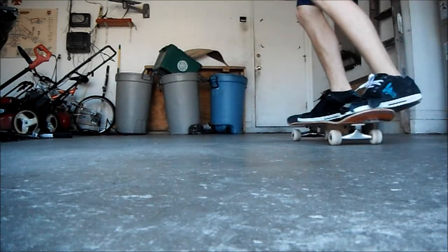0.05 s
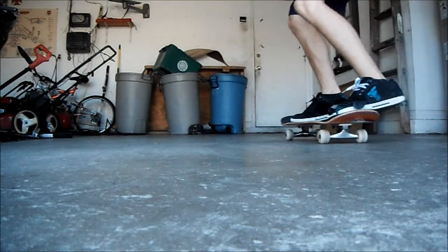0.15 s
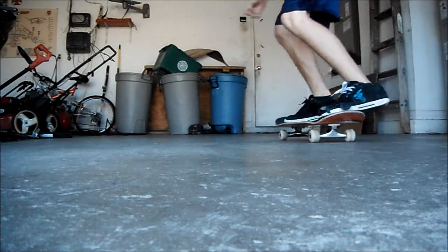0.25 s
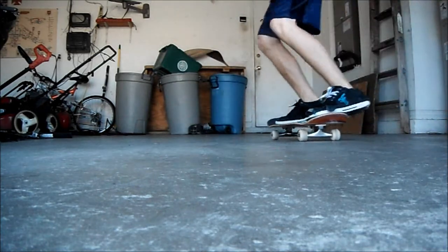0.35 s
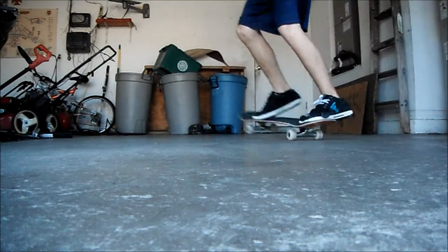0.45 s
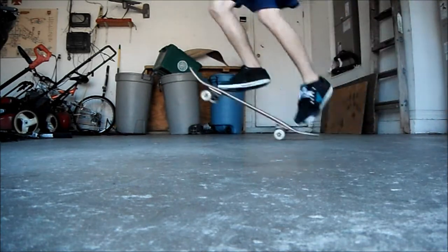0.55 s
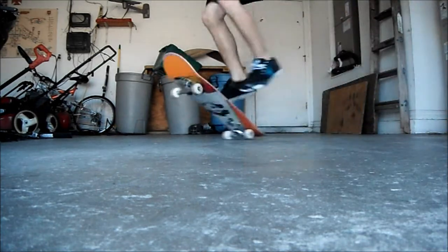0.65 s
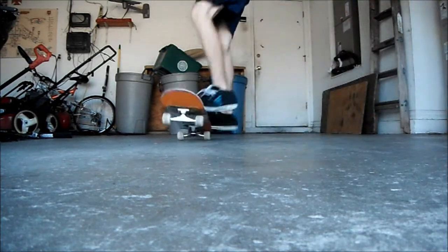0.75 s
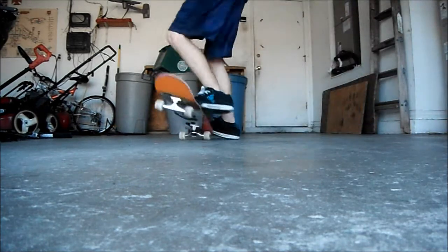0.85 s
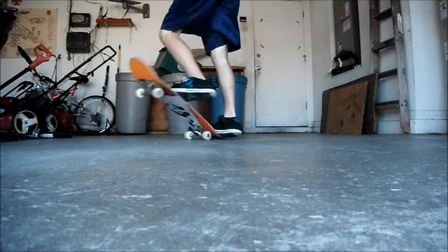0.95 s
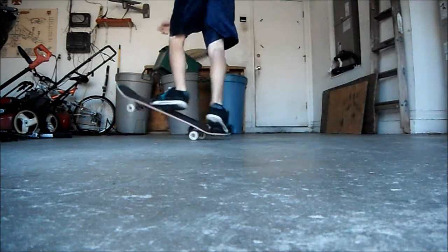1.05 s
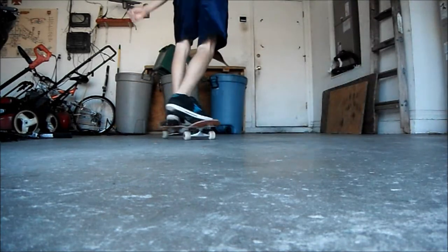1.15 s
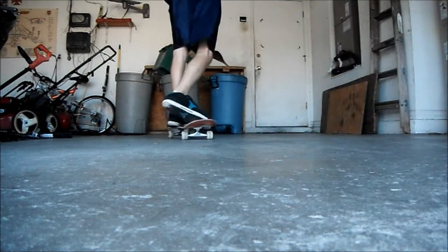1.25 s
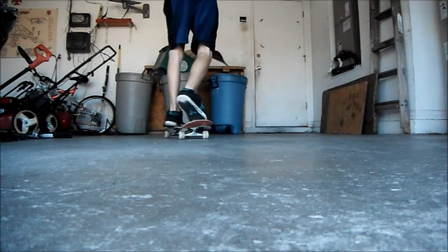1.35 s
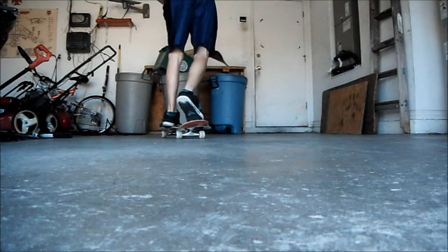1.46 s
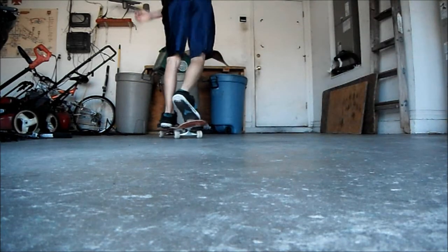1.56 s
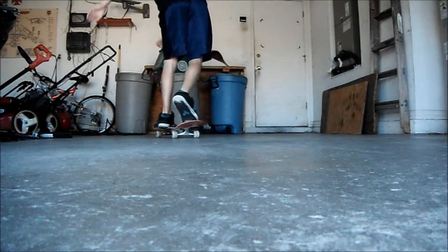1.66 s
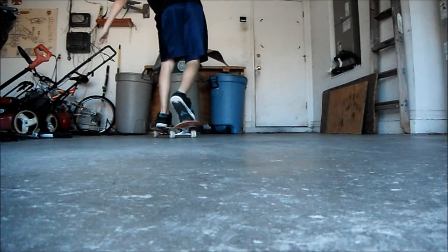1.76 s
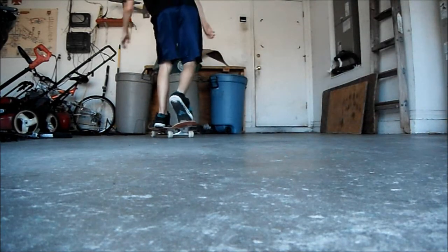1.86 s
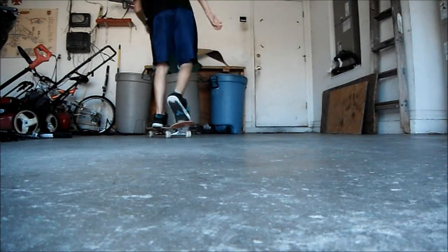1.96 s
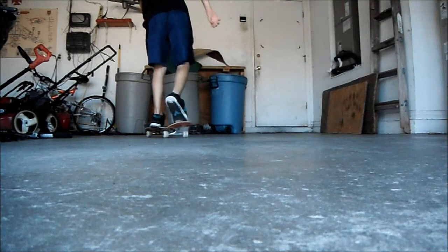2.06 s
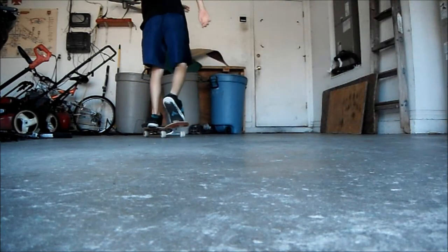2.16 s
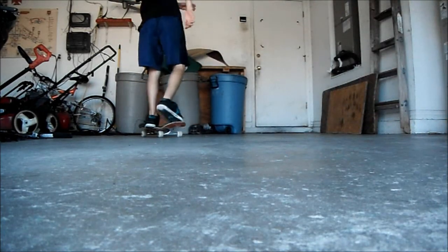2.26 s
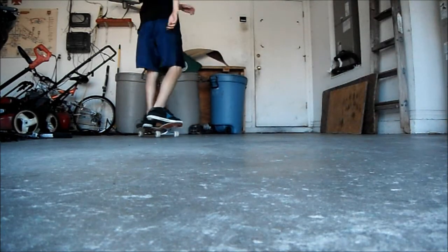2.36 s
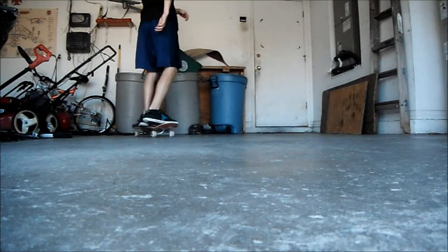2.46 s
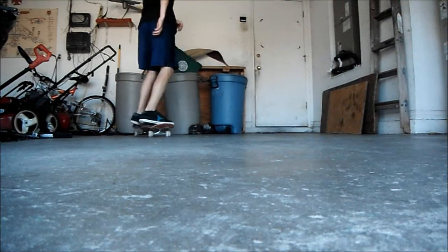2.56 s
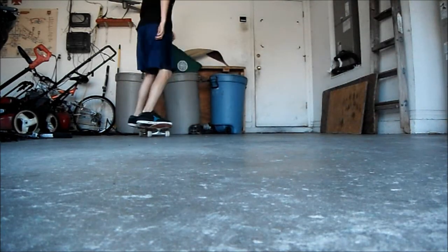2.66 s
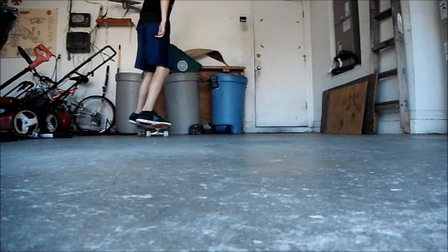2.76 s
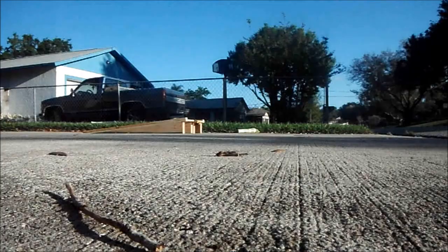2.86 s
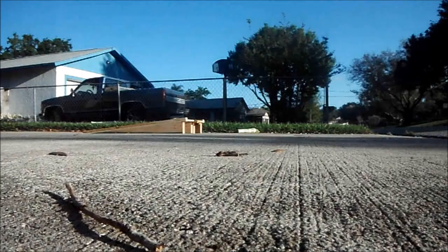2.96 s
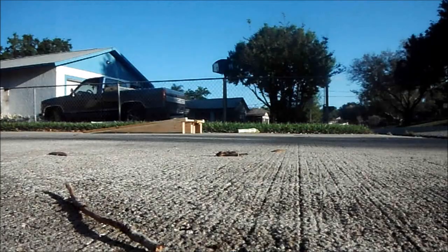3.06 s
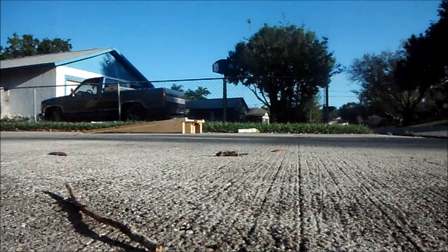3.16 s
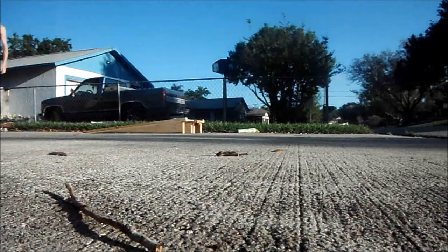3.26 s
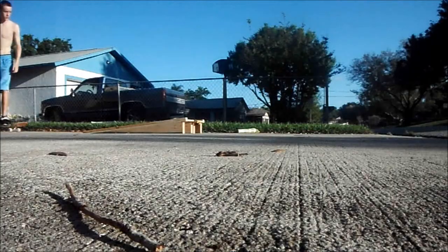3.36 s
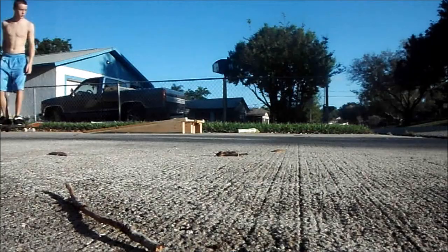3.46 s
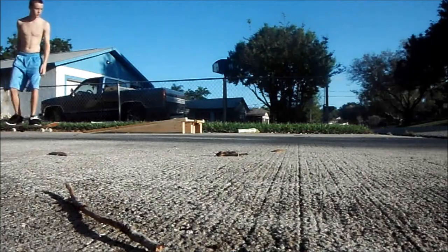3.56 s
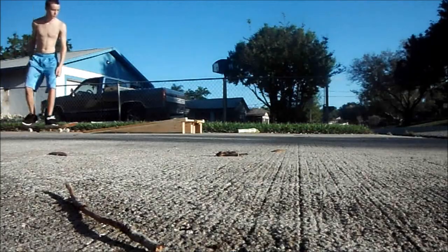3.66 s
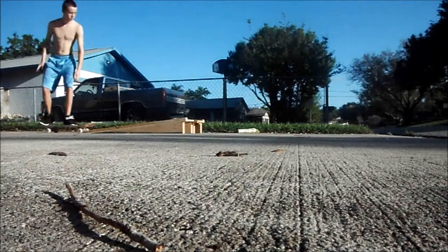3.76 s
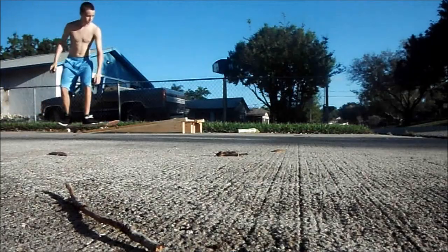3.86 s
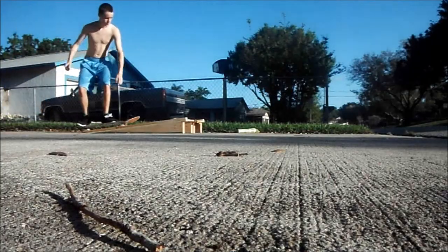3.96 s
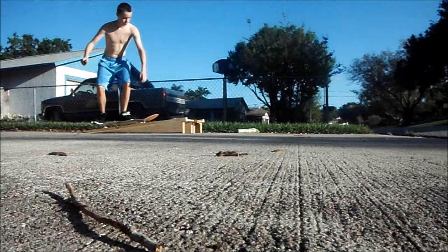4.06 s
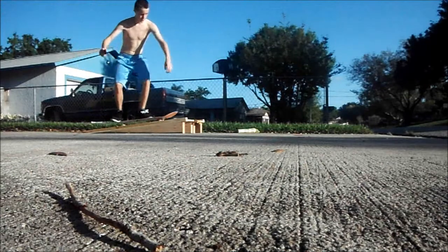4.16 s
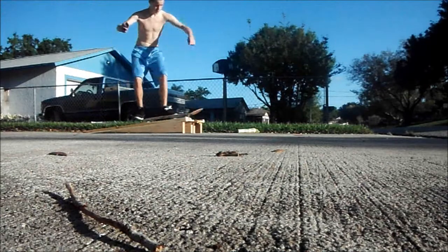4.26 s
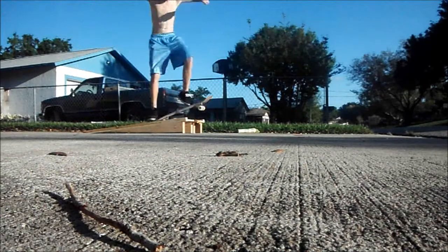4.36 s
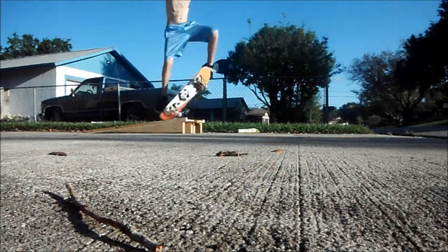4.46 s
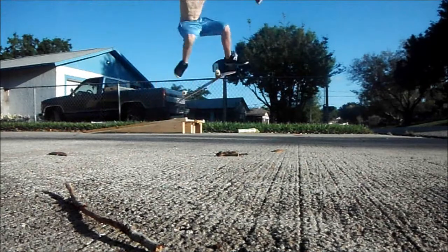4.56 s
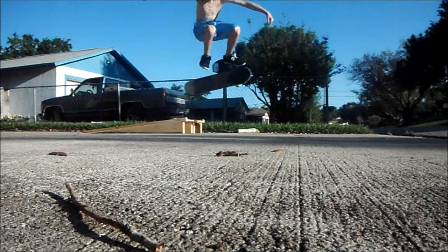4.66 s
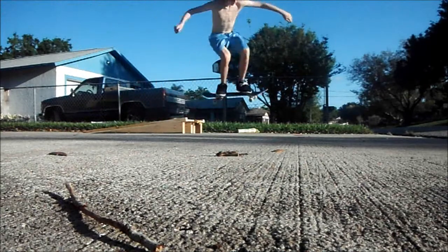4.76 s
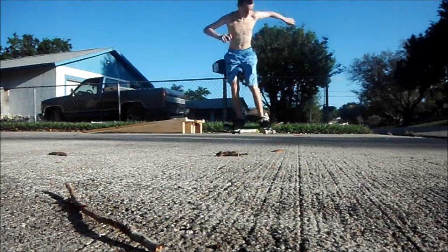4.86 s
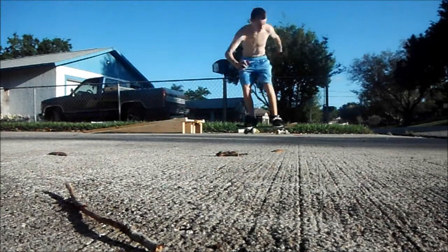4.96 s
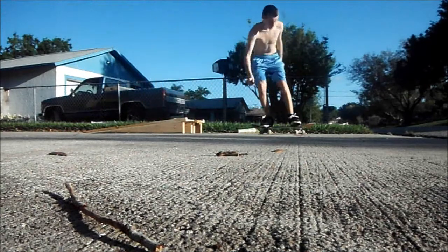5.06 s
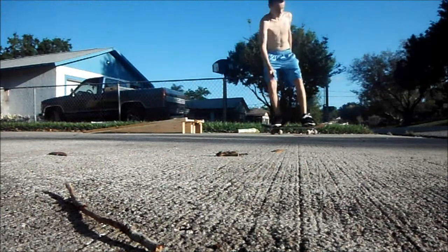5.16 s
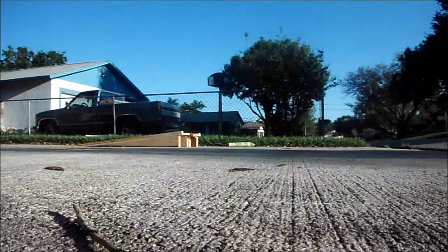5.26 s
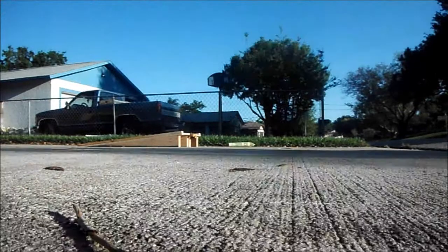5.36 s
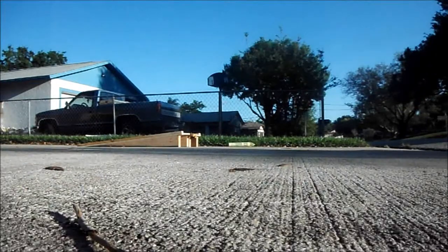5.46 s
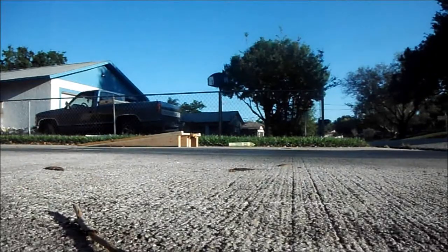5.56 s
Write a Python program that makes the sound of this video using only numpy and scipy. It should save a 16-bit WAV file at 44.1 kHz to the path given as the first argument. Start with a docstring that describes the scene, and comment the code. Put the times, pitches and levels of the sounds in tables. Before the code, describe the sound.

Two skateboard tricks, no talking. First, indoors with short room echo: soft rolling, scraping pivots, rapid wooden cracks, a metallic ping, a landing slap, then faint rasping soles and another knock. Abruptly outside, dry and open: rough rumbling wheels with rattle and grit, a heavy thump and boom on a wooden ramp, a sharp take-off crack, a landing and rolling away. Loud blows clip and duck the gain.

```python
"""Two skateboard runs. In a garage a board pivots, pops, slaps down and rolls on smooth concrete.
Then, outdoors, a board rumbles over rough pavement, bangs onto a wooden ramp, pops off it and lands.
Rolling, skidding and scuffing are streams of tiny random impacts, filtered and faded in and out.
Each blow is a knock with a burst of chatter that cracks, slaps the wheels and bends the deck.
The loudest blows overload the microphone and duck its gain."""
import sys
import numpy as np
from scipy import signal
from scipy.fft import rfft, irfft, next_fast_len
from scipy.io import wavfile

SR = 44100
rng = np.random.default_rng(int(sys.argv[2]) if len(sys.argv) > 2 else 0)


def log_audio(samples):
    """Write samples as a 16-bit WAV file to the path given in sys.argv[1]."""
    # one column per channel
    frames = np.atleast_2d(samples).T
    # limit to full scale, then quantise
    limited = np.clip(frames, -1, 1)
    pcm = np.round(limited * 32767).astype(np.int16)
    wavfile.write(sys.argv[1], SR, pcm)


N = 246959
TIME = np.arange(N) / SR
BINS = np.fft.rfftfreq(8192, 1 / SR)  # the frequencies (Hz) at which filters are drawn
OUTDOORS_AT_S = 2.806  # the garage ends and the street begins

# stretches of rolling outdoors: start t/s, length/s, rumble level/dB, grit level/dB, wheel hum f/Hz
STREET_ROLLS = [(2.782, 1.19, -30.5, -36, 136.8), (3.902, 0.22, -31.5, -64, 187),
                (4.257, 0.085, -26, -69.5, 193), (4.936, 0.28, -39, -41.5, 128.3),
                (5.234, 0.45, -29.5, -35.5, 98)]
GRIT_SAG_DB_PER_S = 6.5  # the grit fades as the board coasts


def amp(db):
    """Decibels to gain."""
    return 10 ** (np.asarray(db) / 20)


def evened(x):
    """Scales to rms 1."""
    return x / np.sqrt(np.mean(x ** 2) + 1e-20)


def read(points, hz):
    """Reads a table of (f/Hz, value) on a log-frequency axis."""
    f, value = np.transpose(points)
    return np.interp(np.log(hz + 1), np.log(f + 1), value)


def level(rows):
    """Turns rows of (t/s, level/dB) into a gain over time."""
    return amp(np.interp(TIME, *np.transpose(rows)))


def add(mix, s, sound):
    """Mixes a sound in at time s."""
    part = mix[round(s * SR):][:len(sound)]
    part += sound[:len(part)]


def peaks(modes):
    """Gain of resonances (f/Hz, width/Hz, level/dB), falling away below and above them."""
    power = 0
    for f, width, db in modes:
        power = power + amp(db) ** 2 * (BINS * width) ** 2 / ((BINS ** 2 - f ** 2) ** 2 + (BINS * width) ** 2)
    return np.sqrt(power)


def colour(x, gain):
    """Filters x by the shape of gain on BINS, scaled to unit energy; nothing sounds ahead of its cause."""
    log_gain = np.log(np.maximum(np.r_[gain, gain[-2:0:-1]], 1e-4))
    minimum_phase = np.exp(np.conj(signal.hilbert(log_gain)))
    taps = np.fft.ifft(minimum_phase).real[:len(BINS)]
    return signal.oaconvolve(x, taps / np.linalg.norm(taps))[:N]


def drift(per_s):
    """Smooth random wander of rms 1; a higher per_s wanders faster."""
    smoothing = 1 + (np.fft.rfftfreq(N, 1 / SR) / per_s) ** 4
    return evened(irfft(rfft(rng.standard_normal(N)) / smoothing, N))


def grains(per_s, spread_db, lumpy_db):
    """Tiny impacts of uneven size and random sign, swelling and thinning in strength; rms 1."""
    size = amp(spread_db * np.minimum(rng.exponential(1, N), 4)) * rng.choice([-1, 1], N)
    happens = rng.random(N) < per_s / SR
    return evened(size * happens * amp(lumpy_db * drift(25)))


def resonate(x, hz, width):
    """A resonance of gain 1 whose pitch may follow a curve: shift to zero, low-pass, shift back."""
    turn = np.exp(2j * np.pi * np.cumsum(hz * np.ones(N)) / SR)
    low_pass = signal.butter(2, width / 2, fs=SR, output="sos")
    return 2 * (turn * signal.sosfilt(low_pass, x / turn + 1e-12)).real


def strokes(rows, attack_s, release_s, sag_db_per_s=0):
    """Gain over time for rows (t/s, length/s, level/dB): each rises, holds or sags, and dies away."""
    power = np.zeros(N)
    for s, length, db in rows:
        t = np.maximum(TIME - s, 0)
        rise = np.minimum(t / attack_s, 1)
        fall = np.exp(-np.maximum(t - length, 0) / release_s)
        power += (amp(db - sag_db_per_s * t) * rise * fall) ** 2
    return np.sqrt(power)


def reverb(x, t60, gap_s):
    """Sparse reflections of random sign, each band dying at its own speed; t60 rows: f/Hz, t60/s."""
    count = SR // 20
    taps = np.zeros(SR)
    # one reflection at a random place in every 20 samples
    taps[np.arange(count) * 20 + rng.integers(0, 20, count)] = rng.choice([-1, 1], count)
    hz, t, bands = signal.stft(taps, SR, nperseg=512)
    tail = signal.istft(bands * amp(-60 * t / read(t60, hz)[:, None]), SR)[1]
    tail = np.r_[np.zeros(round(gap_s * SR)), tail]
    return signal.oaconvolve(x, tail / np.linalg.norm(tail))[:N]


def garage_air():
    """Still air in the garage: steady noise, strongest in the bass."""
    # shape of the noise: f/Hz, relative level/dB
    air_shape = [(20, 1), (60, -0.5), (130, 1.5), (250, -8.5), (500, -7), (900, -14.5), (1800, -15),
                 (3200, -20.5), (6000, -21), (10000, -28), (16000, -36)]
    return amp(-43.5) * colour(rng.standard_normal(N), amp(read(air_shape, BINS)))


def street_air():
    """Still air outdoors: steady noise with its own spectrum."""
    # shape of the noise: f/Hz, relative level/dB
    air_shape = [(20, -9.5), (70, 3.5), (160, 9.5), (280, -5.5), (500, -21), (720, -0.5), (1300, -8),
                 (3200, -17), (6000, -30), (10000, -34), (16000, -32)]
    return amp(-42) * colour(rng.standard_normal(N), amp(read(air_shape, BINS)))


def squeak():
    """Faint, slightly falling whistles: sine waves with a wavering pitch."""
    # thin squeaks: t/s, length/s, level/dB, starting f/Hz
    squeaks = [(3.541, 0.044, -41, 2775), (3.6, 0.027, -37.5, 2690)]
    attack_s, release_s, sag_hz_per_s = 0.019, 0.018, 800
    waver, whistles = 1 + 0.0044 * drift(76), np.zeros(N)
    for s, length, db, hz in squeaks:
        turns = np.cumsum((hz - sag_hz_per_s * (TIME - s)) * waver) / SR
        whistle = np.sqrt(2) * np.sin(2 * np.pi * turns)
        whistles += strokes([(s, length, db)], attack_s, release_s) * whistle
    return whistles


def rasps():
    """Soles rasp over grip tape in tiny jerks, raspy tails follow two knocks, and a foot slide hisses."""
    # shoes dragging over grip tape, and raspy tails after the knocks at 1.83 and 4.82 s:
    # t/s, length/s, level/dB
    rasp_strokes = [(0, 0.073, -42), (.98, 0.028, -27), (1.61, 0.11, -50), (1.83, 0.018, -36),
                    (2.35, 0.59, -43), (4.487, 0.029, -28), (4.82, .015, -33.5), (4.87, .045, -40.5)]
    # sound of the rasp, like rubber on grip tape: f/Hz, relative level/dB
    rasp_colour = [(200, -0.5), (900, 3), (2100, 4.5), (3000, -3), (4500, -2.5), (6200, -9), (9000, -14.5),
                   (16000, -26)]
    # a foot sliding into position: t/s, length/s, level/dB
    foot_slide = (2.49, 0.065, -34)
    # its hiss: f/Hz, width/Hz, relative level/dB
    slide_band = (4840, 3100, 0)
    slide = strokes([foot_slide], attack_s=0.051, release_s=0.14)
    slide_rasp = amp(-4) * slide
    rasp_gain = np.hypot(strokes(rasp_strokes, attack_s=.014, release_s=0.042), slide_rasp)
    rasp = rasp_gain * colour(grains(9000, 3.4, 1.1), amp(read(rasp_colour, BINS)))
    hiss = colour(rng.standard_normal(N), peaks([slide_band]) ** 2)
    return rasp + slide * hiss


def garage_wheels():
    """Rolling on smooth concrete is a stream of tiny impacts, silent while the board is in the air."""
    # wheels on the garage floor: t/s, level/dB
    roll_level = [(0, -32), (.15, -36), (.35, -36.5), (.45, -26.5), (.8, -29.5), (1.3, -55), (1.6, -40),
                  (2.3, -50), (2.4, -40.5), (2.66, -41), (2.81, -21)]
    # sound of the wheels: f/Hz, relative level/dB
    wheel_colour = [(50, -26.5), (130, -15.5), (178, 2), (240, 1.5), (320, -2.5), (420, -2.5), (600, 0.5),
                    (760, -2.5), (950, -7), (1400, -8.5), (3000, -23.5), (5000, -21), (9000, -27),
                    (16000, -35.5)]
    # the board is in the air: from t/s, to t/s
    airborne = (.82, 1.1)
    grounded = (TIME < airborne[0]) | (TIME > airborne[1])
    return grounded * level(roll_level) * colour(grains(6000, 2.5, 0.64), amp(read(wheel_colour, BINS)))


def skidding():
    """Urethane wheels skid sideways in the pivot, slipping in many tiny jerks."""
    # skids: t/s, length/s, level/dB
    skids = [(.455, .045, -26), (.571, 0.039, -20), (.685, 0.035, -23.5)]
    # urethane skidding on concrete: f/Hz, relative level/dB
    skid_colour = [(150, -45.5), (500, -12), (1000, 4), (2300, -2), (3300, -8.5), (8000, -16.5),
                   (16000, -27.5)]
    slips = grains(3000, 2.6, 1.7)
    return strokes(skids, attack_s=0.021, release_s=0.044) * colour(slips, amp(read(skid_colour, BINS)))


def street_wheels():
    """Bumps shake the wheels, the deck drones and the trucks rattle; grit crackles underneath."""
    # the rumble of rough pavement: f/Hz, relative level/dB
    pavement = [(25, -2), (60, -11), (110, -3.5), (200, 0), (300, 0), (420, 2.5), (550, -3), (800, -6),
                (1000, -14.5), (1350, -15), (2000, -22), (3000, -34), (16000, -48)]
    # the grit on it: f/Hz, relative level/dB
    grit_colour = [(400, 7.5), (1500, 10.5), (3000, -2.5), (4500, 0), (6000, -4.5), (7400, -3), (10000, -8),
                   (13000, -15), (16000, -18)]
    # loose truck hardware shaken by the pavement: f/Hz, width/Hz, relative level/dB
    rattle_modes = [(745, 36, 0), (780, 43, -6), (1220, 88, 3.5), (1385, 47, -13), (1910, 110, -6)]
    # the wheels crunch through patches of loose grit: t/s, length/s, level/dB
    grit_patches = [(3.19, 0.043, -34.5), (3.355, 0.024, -33), (4.4, 0.047, -41), (4.94, 0.09, -38),
                    (5.16, .04, -34), (5.435, 0.06, -29)]
    roll_attack_s, grit_release_s = 0.011, 0.022

    bumps = grains(4500, 2.2, 1.5)
    start, length, rumble_db, grit_db, hum_hz = np.transpose(STREET_ROLLS)
    wheel_hz = hum_hz[np.searchsorted(start[1:], TIME)]
    hum = evened(resonate(bumps, wheel_hz * (1 + 0.06 * drift(21)), 19.4))
    # the wheel's bounce is limited by its bushing, so the hum stays fairly even
    hum = evened(hum / np.sqrt(1 + abs(signal.hilbert(hum)) ** 2))
    drone = evened(resonate(bumps, 410 * (1 + 0.113 * drift(5.1)), 26.0))
    rumble = amp(0.5) * colour(bumps, amp(read(pavement, BINS))) + amp(-7.5) * hum + amp(-7.5) * drone
    jolts = grains(700, 2, 3)
    rattle = colour(jolts, peaks(rattle_modes) / np.hypot(1, (BINS / 2200) ** 2))
    rumble = rumble + amp(-10) * rattle
    grit = colour(grains(4500, 3.4, 1.8), amp(read(grit_colour, BINS)))

    # the coasting board fades, its grit faster than its rumble
    rolling = strokes(zip(start, length, rumble_db), roll_attack_s, release_s=0.084, sag_db_per_s=2.5)
    gritty = strokes(zip(start, length, grit_db), roll_attack_s, grit_release_s, GRIT_SAG_DB_PER_S)
    crunch = strokes(grit_patches, 0.0098, grit_release_s)
    return rolling * rumble + np.hypot(gritty, crunch) * grit


def ramp():
    """The hollow wooden ramp booms whenever weight comes onto it: impacts through its resonances."""
    # weight on the ramp: t/s, length/s, level/dB
    loads = [(3.9, 0.084, -16.5), (4.02, 0.074, -23), (4.2, .25, -27.5), (4.51, 0.054, -21.5)]
    # resonances of the hollow ramp: f/Hz, width/Hz, relative level/dB
    boom_modes = [(188, 43, 4.5), (309, 47, 0), (420, 60, -15)]
    boom = colour(grains(6000, 2.8, 0.92), peaks(boom_modes) / np.hypot(1, (BINS / 700) ** 2))
    return strokes(loads, attack_s=0.034, release_s=0.028) * boom


def truck():
    """The tail strike makes a metal truck ring at one wavering pitch, damped almost at once."""
    # the ring: t/s, length/s, level of the sine's peak/dB
    ring = (.806, .003, 7.9)
    turns = np.cumsum(2382 * (1 + 0.0127 * drift(200))) / SR
    return strokes([ring], attack_s=.002, release_s=0.0055) * np.sin(2 * np.pi * turns)


def contact(s, decay, hardness, crack_db, slap_db, thud_db):
    """One blow for the board: the harder it is, the quicker it rises and the more treble it keeps."""
    soft_rise_s, hard_rise_s, soft_hz, hard_hz = .0021, .00035, 1400, 15100
    rise = soft_rise_s * (hard_rise_s / soft_rise_s) ** hardness
    dull_hz = soft_hz * (hard_hz / soft_hz) ** min(hardness, 1)
    return s, rise, decay, crack_db, dull_hz, slap_db, thud_db


def pebbles():
    """Wheels kick stray pebbles: small knocks at random moments, as strong as the ground is gritty."""
    per_s, decay_s, hardness, spread_db = 14, .0045, 0.75, 3
    crack_db, slap_db, thud_db = 6, 0, -5  # over the grit
    blows = []
    for start, length, _, grit_db, _ in STREET_ROLLS:
        # 24 candidates spread over a longer time; those after the stretch are dropped
        for wait, size in rng.random((24, 2)) * [24 / per_s, 1]:
            db = grit_db - GRIT_SAG_DB_PER_S * wait + spread_db * (2 * size - 1)
            if wait < length:
                blows.append(contact(start + wait, decay_s, hardness,
                                     db + crack_db, db + slap_db, db + thud_db))
    return blows


def tricks(outdoors):
    """The blows in one place, single and double; in the garage a dull slap follows each double blow."""
    # single blows: deck clacks, knocks from the road under the wheels, ticks on the ramp:
    # t/s, crack level/dB, chatter decay/s, hardness (about 0-1), thud level/dB
    single_blows = [(.472, -11, 0.0041, 0.86, -29), (.694, -14, 0.017, 0.44, -39),
                    (.734, -9, .012, 0.49, -27), (.743, -4, 0.0067, 1, -27), (.771, -8, 0.0026, .55, -34.5),
                    (.781, -10.5, 0.0036, .35, -41), (.788, 0, 0.0036, .5, -30),
                    (.800, -5, 0.01, 0.25, -40), (.979, 0, 0.0017, 0.5, -43),
                    (1.830, -14.5, 0.0019, 1.0, -40), (2.664, -5.5, .0024, .55, -44),
                    (3.147, -26, 0.0067, 0.18, -33), (3.53, -25, .008, 0.23, -26.5),
                    (3.597, -23.5, 0.0046, 0.53, -28), (3.891, -3.5, 0.0053, 0.37, -3.5),
                    (4.387, -25.5, .006, 1, -22), (4.487, -1.5, 0.0046, 0.64, -13),
                    (4.801, -16.5, .011, 0.55, -21), (4.824, -8.5, 0.0044, 0.72, -31)]
    # double blows: the pop, landings, and knocks as trucks or wheels strike one after the other:
    # t/s, chatter decay/s, thud level/dB, first strike, lag/s, second strike;
    # each strike is (hardness (about 0-1), crack level/dB, wheel slap level/dB)
    double_blows = [(.807, 0.0087, 2.5, (1.0, 3.6, -19), .009, (0.72, -0.5, 1.4)),
                    (1.218, .0135, -0.5, (0.96, 3.1, -6), .008, (0.014, -15.5, 6.7)),
                    (1.839, .015, -35, (0.22, -23, -18.5), 0.024, (0.12, -21.5, -26)),
                    (2.669, .019, -18, (0.97, -3.5, -7), 0.019, (0.43, -1.7, 0.45)),
                    (3.412, 0.011, -27.5, (0.85, -23.5, -24), .012, (0.47, -18.5, -23)),
                    (3.896, .0112, 5.5, (0.53, 3.1, 0), .016, (0.27, -1.8, -6)),
                    (4.056, .0062, -1, (0.91, -22.5, -35), .004, (0.22, 2.9, -15)),
                    (4.353, 0.012, -21, (0.99, -28.5, -21.5), .008, (0.62, -31, -20.5)),
                    (4.916, .006, -7.5, (0.58, -1.1, 4.4), .014, (0.79, 5.2, 9.9))]
    blows = []
    for s, db, decay, hardness, thud_db in single_blows:
        # the wheel slap stays 23 dB below the crack
        blows.append(contact(s, decay, hardness, db, db - 23, thud_db))
    for s, decay, thud_db, first, lag, second in double_blows:
        # the deck's thud comes with the second strike
        blows.append(contact(s, decay, *first, -np.inf))
        blows.append(contact(s + lag, decay, *second, thud_db))
        if not outdoors:
            # a dull slap follows, 19.5 dB below the second strike's slap
            blows.append(contact(s + .064, .013, .02, -np.inf, second[-1] - 19.5, -np.inf))
    return [blow for blow in blows if (blow[0] >= OUTDOORS_AT_S) == outdoors]


def board(blows, slap_modes, thud_modes, solid=0.13):
    """Each blow is a knock and a burst of chatter: it cracks, slaps the wheels and bends the deck."""
    # the hard crack of maple on concrete: f/Hz, relative level/dB
    crack_colour = [(100, -19), (500, -12), (1300, 1.5), (2400, -3), (3200, -9.5), (5000, -11.5),
                    (7500, -14), (10000, -16.5), (12500, -22), (16000, -22)]
    t = np.arange(SR // 4) / SR
    crack, slap, thud = np.zeros((3, N))
    bend = sum(amp(db - 60 * t / t60) * np.sin(2 * np.pi * hz * t) for hz, db, t60 in thud_modes)
    bend = bend * (1 - np.exp(-t / 0.0034))
    for s, rise, decay, crack_db, dull_hz, slap_db, thud_db in blows:
        # many small contacts share the force evenly over all pitches
        size = next_fast_len(int((rise + 2 * decay) * SR))
        phases = 2 * np.pi * rng.random(len(t))[:size // 2 + 1]
        chatter = evened(irfft(np.exp(1j * phases)))
        # plain noise carries on after them
        chatter = np.r_[chatter, rng.standard_normal(len(t))][:len(t)]
        chatter = chatter * np.exp(-t / decay) * (1 - np.exp(-t / rise))
        # the main knock comes at the end of the rise time, with the energy of the chatter
        knock = np.linalg.norm(chatter) * signal.unit_impulse(len(t), int(rise * SR))
        # a soft contact loses its treble
        softness = signal.butter(2, min(dull_hz, SR / 2 - 1000), fs=SR)
        add(crack, s, amp(crack_db) * signal.lfilter(*softness, chatter))
        push = np.sqrt(max(1 - solid ** 2, 0)) * chatter + solid * knock
        add(slap, s, amp(slap_db) * signal.lfilter(*softness, push))
        add(thud, s, amp(thud_db) * bend)
    # the slap weakens above 2200 Hz and below 140 Hz
    slap_gain = peaks(slap_modes) / np.hypot(1, (BINS / 2200) ** 2) / np.hypot(1, 140 / (BINS + 1))
    return colour(crack, amp(read(crack_colour, BINS))) + colour(slap, slap_gain) + thud


def garage():
    """Rolling, skidding and blows on smooth concrete, with the reflections of a hard-walled room."""
    # wheels and deck slapping down: f/Hz, width/Hz, relative level/dB
    slap_modes = [(590, 84, 5), (755, 160, 5), (830, 190, 7), (994, 340, -0.5), (1284, 140, 6),
                  (1646, 260, -8.5), (1990, 150, -4)]
    # low bending modes of the deck: f/Hz, relative level/dB, t60/s
    thud_modes = [(157, -17, 0.17), (236, 1, 0.078), (302, -4.5, 0.1), (355.7, -2.5, 0.066),
                  (465.6, -9.5, 0.085)]
    # a hollow note that lingers in the garage: f/Hz, width/Hz, level/dB
    hollow_note = (712, 8.4, -27.5)
    # how long the room's sound takes to die by 60 dB: f/Hz, t60/s
    room_t60 = [(100, 0.51), (230, 0.19), (450, 0.61), (640, 0.32), (715, 0.78), (820, 0.48), (2000, 0.39),
                (5000, 0.36), (10000, 0.28), (16000, 0.28)]
    blows = board(tricks(outdoors=False), slap_modes, thud_modes, solid=0.19)
    dry = garage_wheels() + skidding() + blows + rasps()
    ring = truck()
    # all of these sounds excite one narrow, slowly dying resonance
    note = amp(hollow_note[2]) * colour(dry, peaks([hollow_note]))
    room = reverb(dry + amp(-7.5) * ring, room_t60, gap_s=.009)
    return dry + ring + note + amp(-10.0) * room


def street():
    """Pavement, ramp and blows in the open, with only a faint scatter from the houses."""
    # wheels and deck slapping down: f/Hz, width/Hz, relative level/dB
    slap_modes = [(400, 106, 2), (699, 160, 8.5), (957, 190, -6.5), (1122, 48, 6.5), (1560, 270, -4)]
    # low bending modes of the deck together with the ramp: f/Hz, relative level/dB, t60/s
    thud_modes = [(185.3, -3, 0.13), (203.2, -2, 0.12), (295, 3.5, 0.06), (376.4, -5.5, 0.14),
                  (476, 1.5, 0.064), (517, 2, 0.054)]
    # how long the scatter takes to die by 60 dB: f/Hz, t60/s
    scatter_t60 = [(100, .1), (700, 0.32), (2500, 0.27), (12000, 0.14)]
    blows = board(tricks(outdoors=True) + pebbles(), slap_modes, thud_modes)
    dry = street_wheels() + ramp() + blows + squeak() + rasps()
    return dry + amp(-28.5) * reverb(dry, scatter_t60, gap_s=0.019)


def scene():
    """The garage gives way abruptly to the street; each has its own still air."""
    inside = garage() + garage_air()
    outside = street() + street_air()
    return np.where(TIME < OUTDOORS_AT_S, inside, outside)[None]


def record(dry, threshold_db=-14, share=0.54, recover_db_per_s=16, attack_s=0.012):
    """Gain control ducks after loud blows, too late for their first peaks, which clip; then a band limit."""
    keep = np.exp(-1 / (attack_s * SR))
    smooth = [1 - keep], [1, -keep]
    power_db = 10 * np.log10(signal.lfilter(*smooth, dry[0] ** 2) + 1e-12)
    # hold each peak of the level, letting it fall at a steady rate
    fall = TIME * recover_db_per_s
    held_db = np.maximum.accumulate(power_db + fall) - fall
    over_db = np.maximum(held_db - threshold_db, 0)
    ducked = dry * amp(-share * signal.lfilter(*smooth, over_db))
    clipped = ducked / (1 + (ducked / .95) ** 4) ** (1 / 4)
    band_limit = signal.firwin(511, 16100, window=("kaiser", 9), fs=SR)  # low-pass at 16100 Hz
    return signal.oaconvolve(clipped, band_limit[None], "same")


dry = scene()
out = record(dry)
log_audio(out)
```